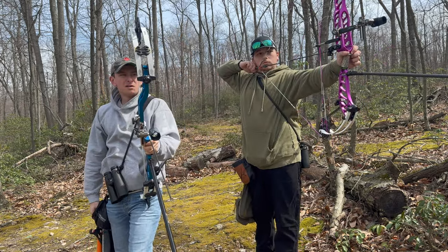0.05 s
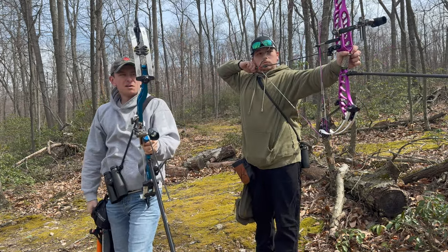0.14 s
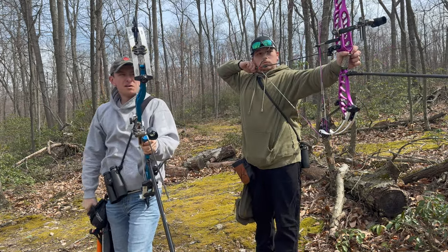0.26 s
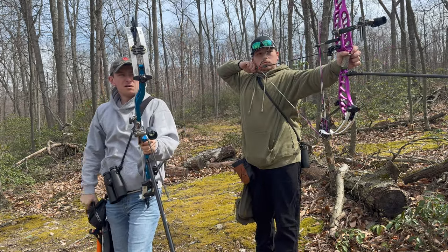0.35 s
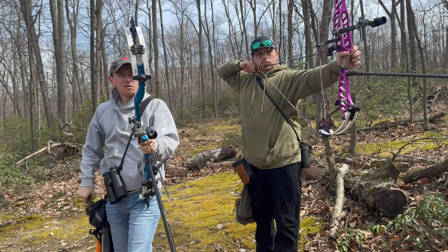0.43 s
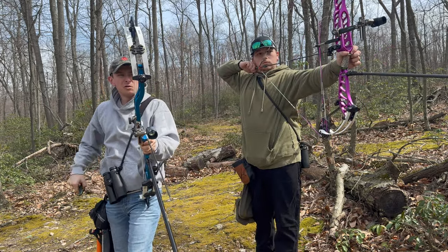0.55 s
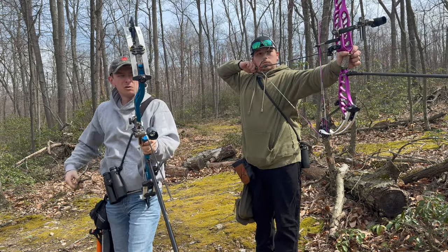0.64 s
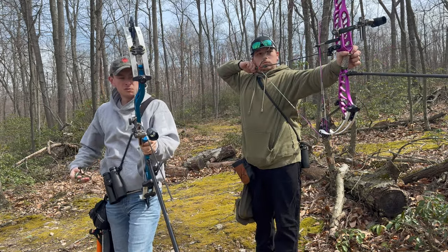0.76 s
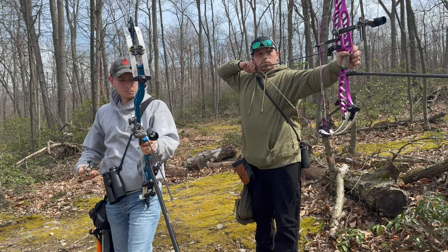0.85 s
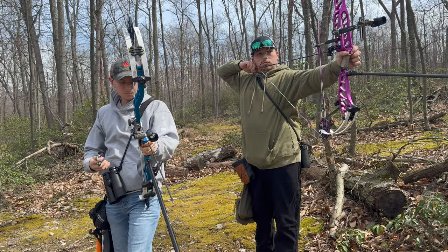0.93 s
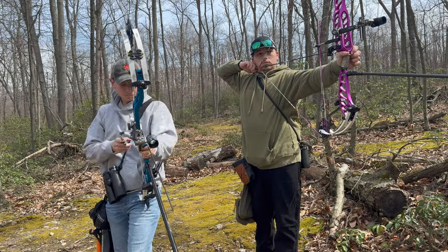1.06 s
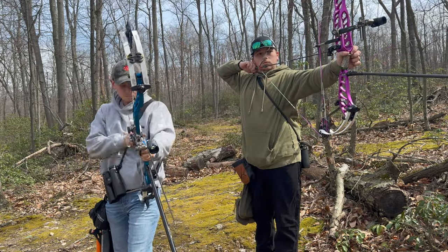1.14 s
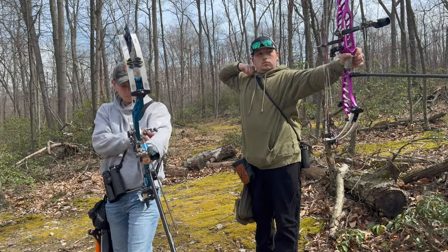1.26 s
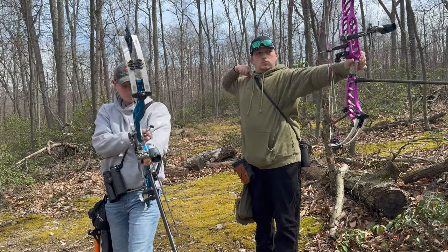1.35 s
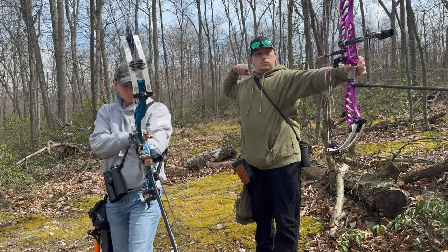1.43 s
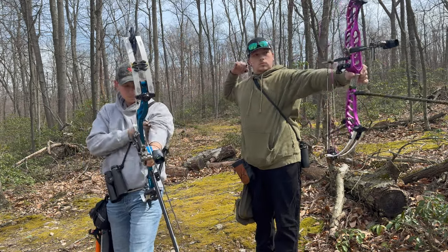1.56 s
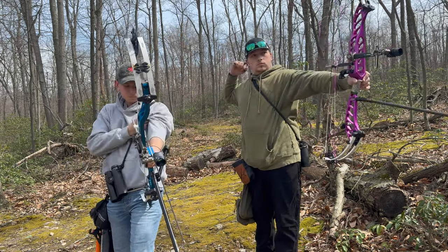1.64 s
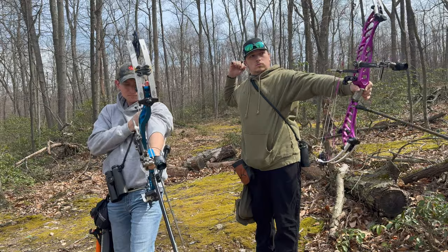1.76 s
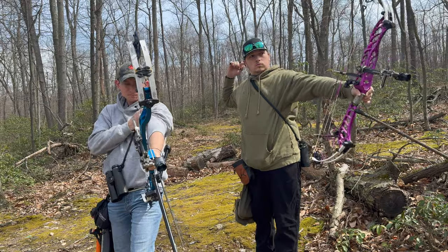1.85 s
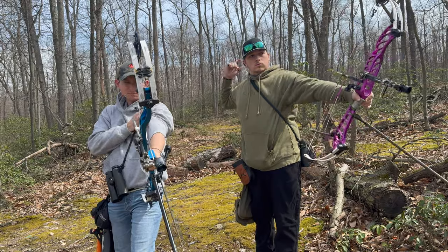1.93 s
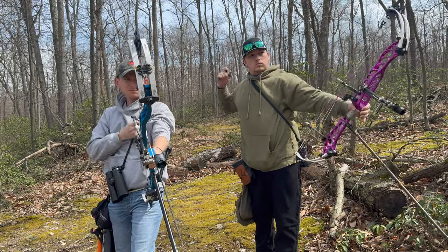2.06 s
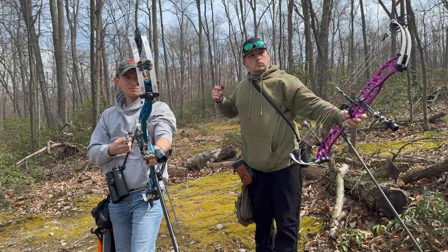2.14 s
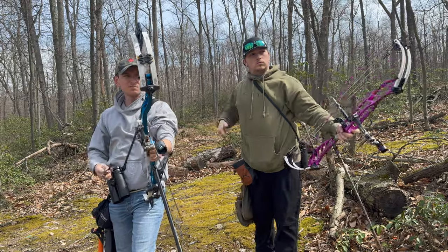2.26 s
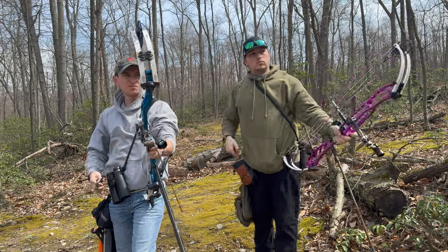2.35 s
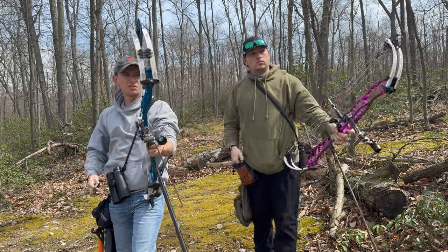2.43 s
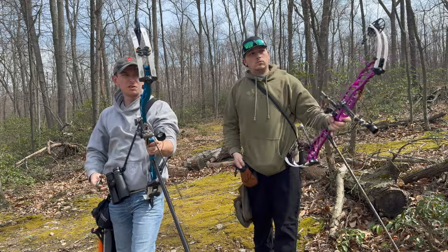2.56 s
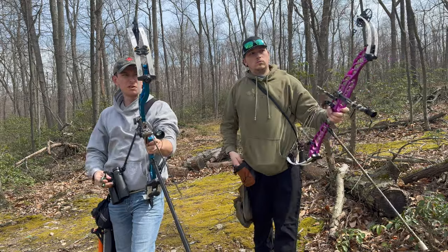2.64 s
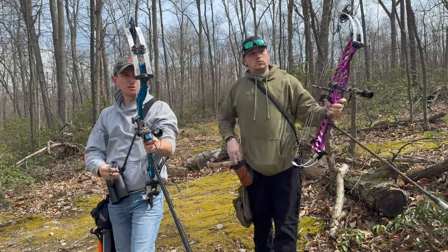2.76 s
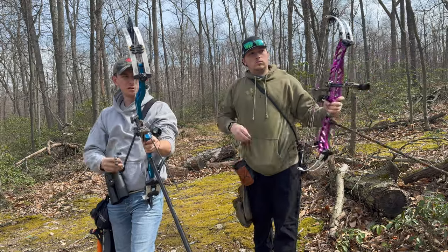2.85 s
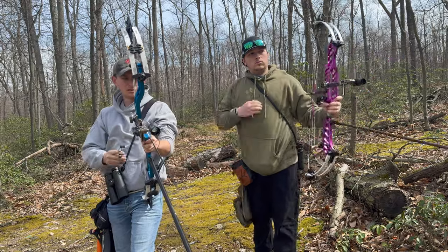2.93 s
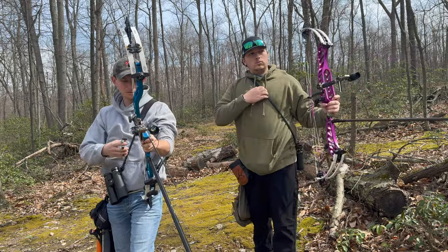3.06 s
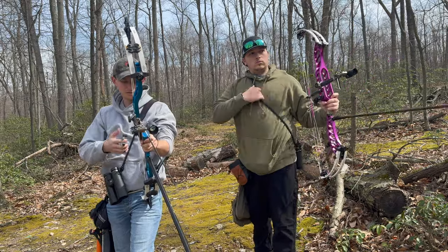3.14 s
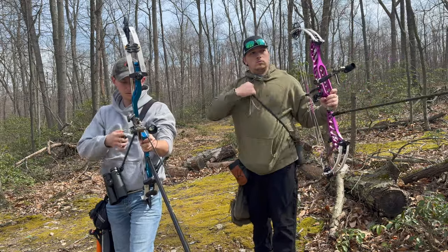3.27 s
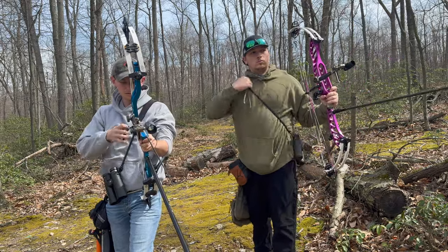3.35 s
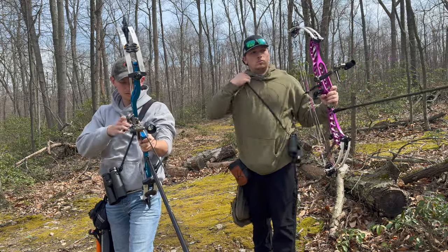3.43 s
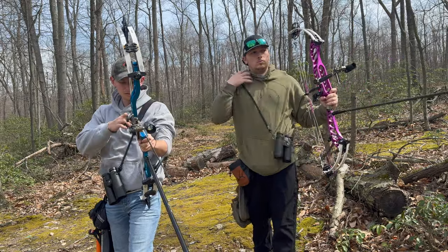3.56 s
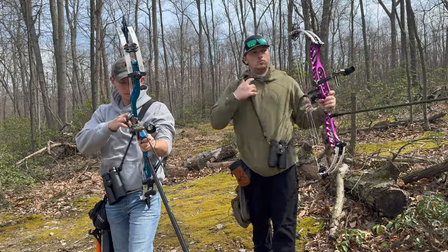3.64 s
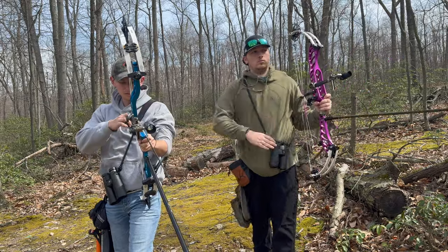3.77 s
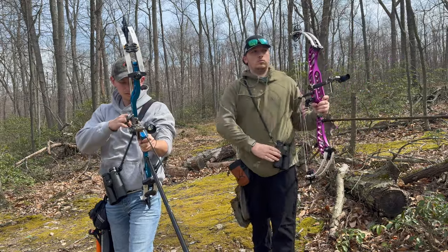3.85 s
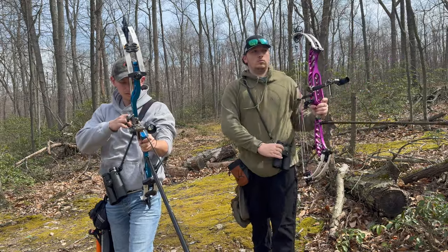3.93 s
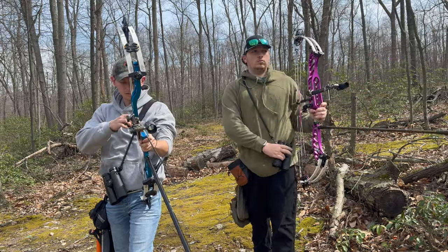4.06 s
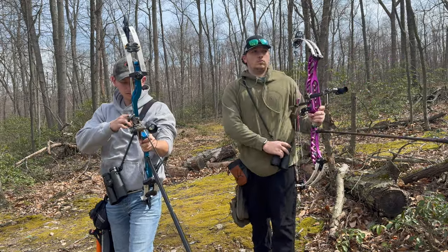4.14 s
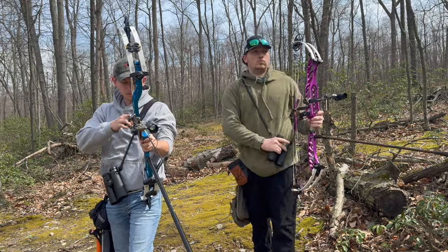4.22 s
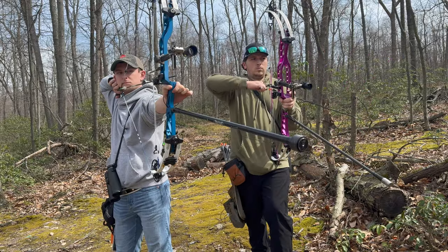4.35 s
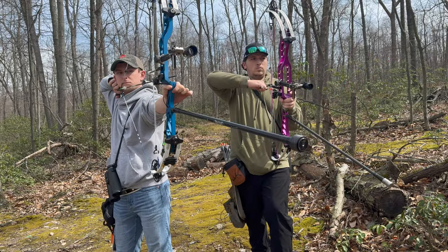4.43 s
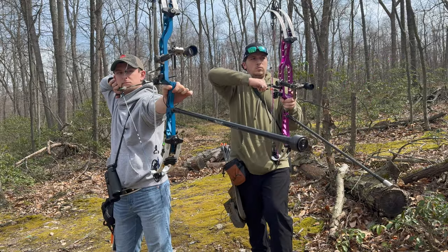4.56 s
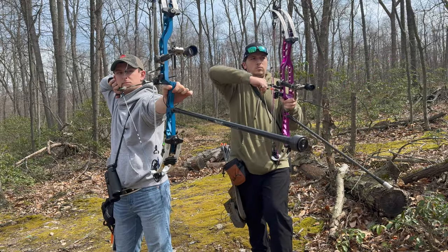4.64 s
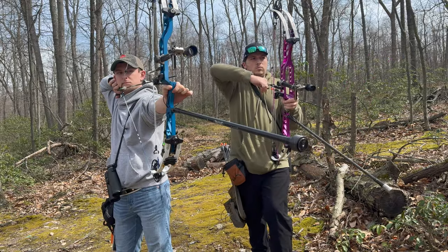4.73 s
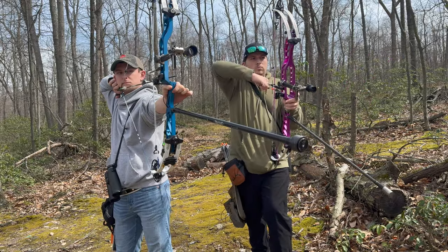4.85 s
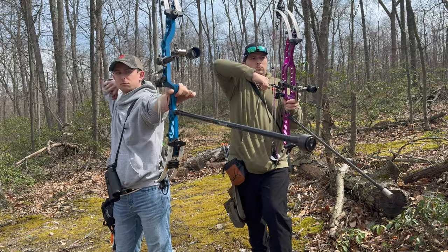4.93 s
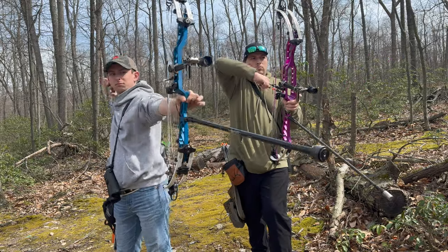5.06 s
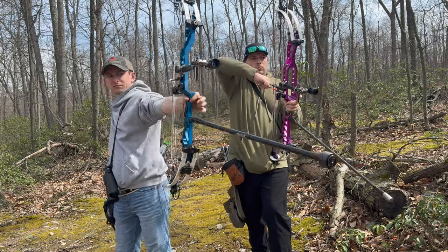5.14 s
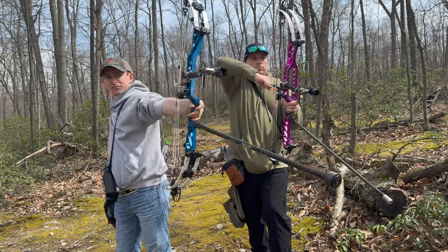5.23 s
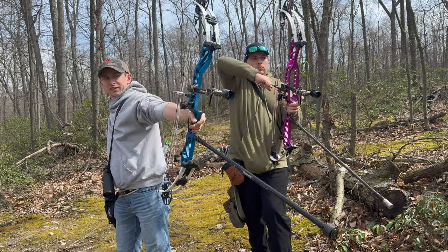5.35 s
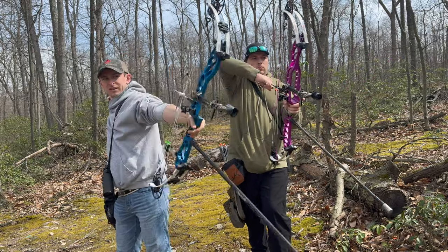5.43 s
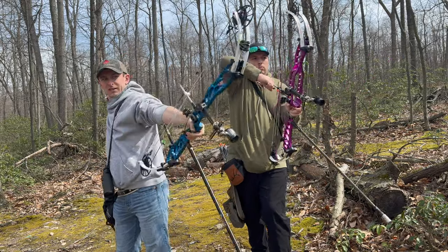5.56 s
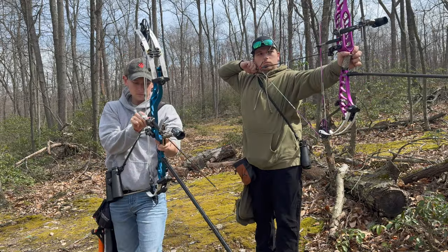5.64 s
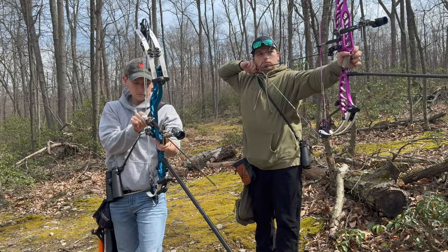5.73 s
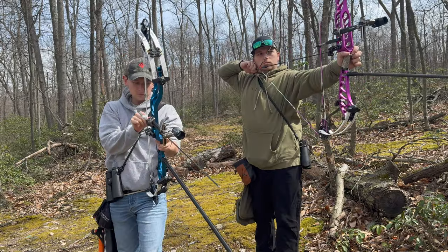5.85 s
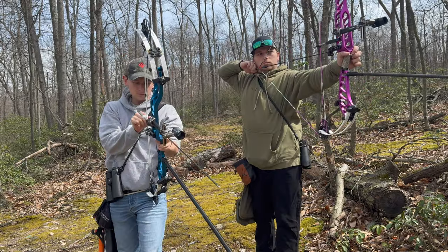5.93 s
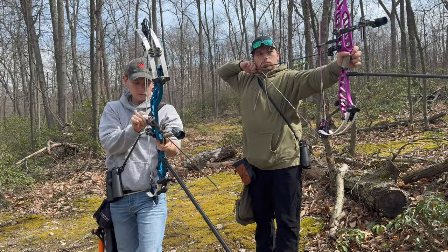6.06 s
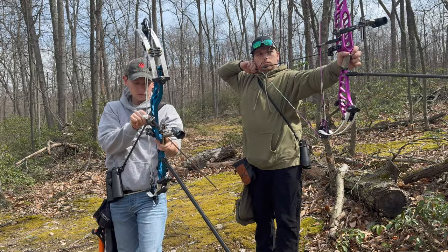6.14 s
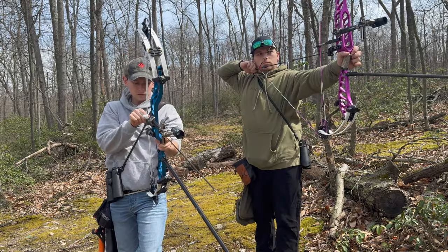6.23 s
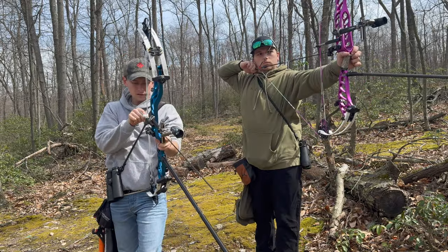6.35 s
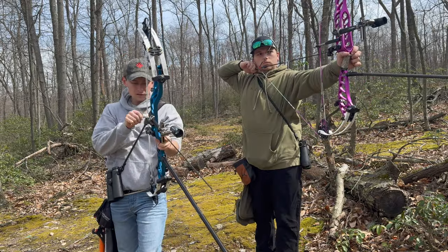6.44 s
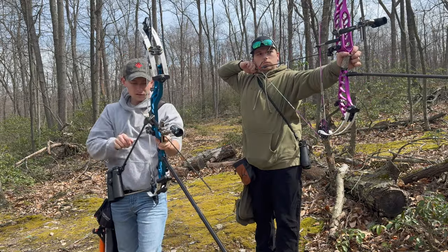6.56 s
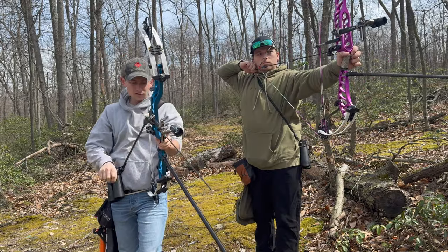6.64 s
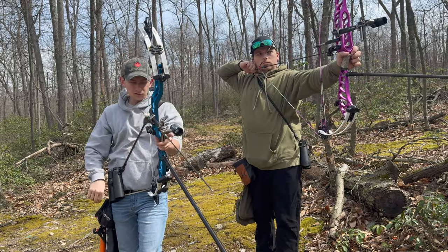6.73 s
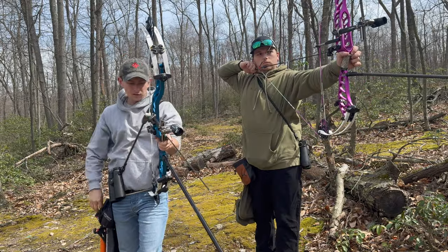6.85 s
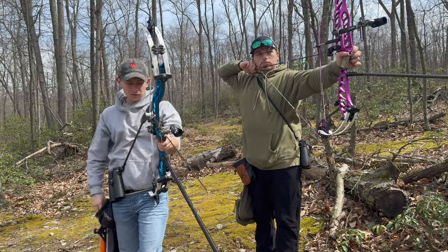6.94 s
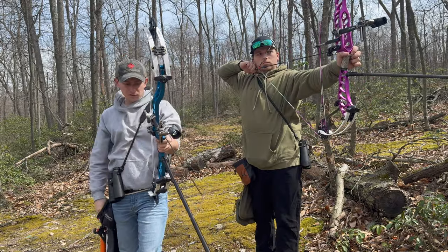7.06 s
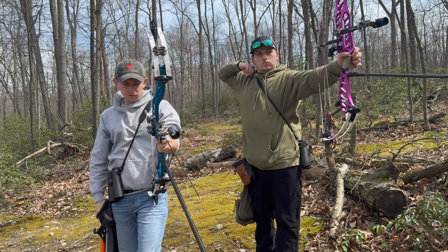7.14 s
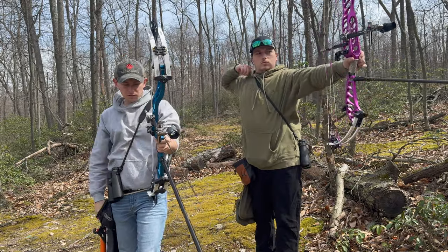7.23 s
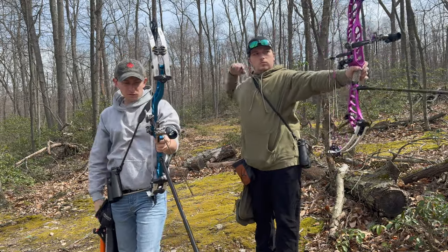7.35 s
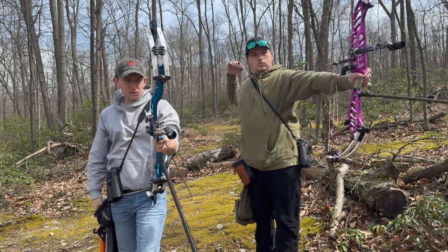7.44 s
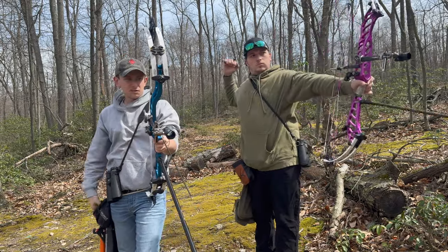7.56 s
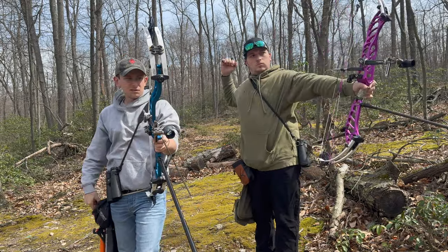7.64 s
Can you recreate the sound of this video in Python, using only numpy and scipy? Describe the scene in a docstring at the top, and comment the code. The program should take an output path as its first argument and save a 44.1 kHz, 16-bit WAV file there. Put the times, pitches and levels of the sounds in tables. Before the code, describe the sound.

Two archers shoot three arrows, heard in stereo from a few steps away. Each release is a brief hiss, a hard slam and a rattling, ringing buzz, then a smaller crack and thud from the distant target with a woody echo. Between shots come soft sleeve brushes, strap ticks and metallic clicks. Low outdoor rumble swells gently, and a very faint bird whistles near the end.

```python
"""Archers in a quiet wood

Two archers shoot three arrows from compound bows, a few steps from the listener. Noise makes each arrow's hiss,
damped modes and rattling noise the slam and ring of the bow, and ticking noise the buzz of its string. A quarter
second later a far target cracks, thuds and shudders, and decaying noise answers from the trees. Cloth and gear are
shaped noise, with a ringing clink; a far bird whistles late on, over a low, swelling rumble."""
import sys
import numpy as np
from scipy import signal
from scipy.fft import rfft, irfft, next_fast_len
from scipy.io import wavfile

SR = 44100
rng = np.random.default_rng(int(sys.argv[2]) if len(sys.argv) > 2 else 0)


def unload_wav(signal):
    """Save mono or channel-first audio to the path in sys.argv[1] as 16-bit WAV at rate SR, clipped to [-1, 1]."""
    wavfile.write(
        sys.argv[1],
        SR,
        np.round(np.clip(np.atleast_2d(signal).T, -1, 1) * 32767).astype(np.int16),
    )


N = 339129
T = np.arange(SR) / SR  # one second of time since a blow


def amp(db):
    """Decibels to gain."""
    return np.exp(np.asarray(db) * (np.log(10) / 20))


def unit(x):
    """Scales to rms 1."""
    return x / np.sqrt(np.mean(x ** 2) + 1e-20)


def read(points, hz):
    """Reads a table on a log-frequency axis."""
    f, value = np.transpose(points)
    return np.interp(np.log(hz + 1), np.log(f + 1), value)


def add(mix, s, sound):
    """Mixes a sound in at time s, cut off at the end of the mix."""
    part = mix[:, round(s * SR):][:, :sound.shape[1]]
    part += sound[:, :part.shape[1]]


def fall(t60):
    """Exponential decay by 60 dB in t60 seconds."""
    return np.exp(-np.minimum(np.log(1000) * T / max(t60, 1e-4), 40))


def hump(centre_hz, octaves):
    """The spectrum of one broad resonance, as a table of Hz and dB."""
    hz = np.geomspace(20, SR / 2, 80)
    distance = np.log2(hz / centre_hz) / octaves
    return np.c_[hz, -20 * np.log10(1 + distance ** 4)]


# How alike the two sides are. Each row: frequency in Hz, left-right coherence from 0 to 1.
COHERENCE = [(100, 0.96), (400, 0.69), (900, 0.68), (1600, 0.41), (3000, 0.13), (7000, .1), (14000, 0.027)]


def noise(spectrum, size=SR, diffuse=False):
    """Stereo noise of rms 1; unless diffuse, both sides are alike in the bass and drift apart above."""
    full = next_fast_len(size, real=True)
    hz = np.fft.rfftfreq(full, 1 / SR)
    left, other = rng.standard_normal((2, 2 * len(hz))).view(complex)
    same = 0 if diffuse else np.clip(read(COHERENCE, hz), -1, 1)
    right = same * left + np.sqrt(1 - same ** 2) * other
    coloured = np.array([left, right]) * amp(read(spectrum, hz))
    return unit(irfft(coloured, full)[:, :size])


def wander(size, rate_hz):
    """Random motion of rms 1, in straight glides between random points."""
    knots = rng.standard_normal(int(size / SR * rate_hz) + 2)
    return unit(np.interp(np.arange(size) / SR * rate_hz, np.arange(len(knots)), knots))


def ring(modes, build=0.0084, waver=0):
    """Damped modes, neighbours in opposite phase; long ones build up slowly, and a shaking body makes each waver."""
    out = np.zeros(SR)
    for k, (hz, db, t60) in enumerate(modes):
        drift = waver * wander(SR, rate_hz=28) * np.minimum(T / 0.055, 1)
        envelope = fall(t60) * (1 - np.exp(-T / (build * t60)))
        out += (-1) ** k * amp(db) * envelope * np.sin(2 * np.pi * hz * T + drift)
    return out


# Share of the left-right level difference that is heard. Each row: frequency in Hz, factor.
SHADOW = [(150, 0.26), (600, 1), (1400, 1.7), (3000, 0.4), (7000, 0), (13000, 0.084)]


def place(x, lag_ms, pan_db, turn=0):
    """Direction: the left port leads by a delay, a phase turn in radians and a level difference."""
    hz, side = np.fft.rfftfreq(SR, 1 / SR), np.array([[.5], [-.5]])
    angle = 2 * np.pi * hz * lag_ms / 1000 + turn
    ports = np.exp(1j * side * angle) * amp(side * pan_db * read(SHADOW, hz))
    fade_out = np.minimum(1, 2 * (1 - T)) ** 2
    return irfft(rfft(x) * ports, SR) * fade_out


# How long the trees keep sounding. Each row: frequency in Hz, decay by 60 dB in seconds.
TREES_T60 = [(100, 0.8), (500, 1.0), (1500, 1.05), (3500, 0.69), (7000, 0.51), (14000, 0.46)]


def trees(spectrum, rise_s):
    """Echoes from many trunks: a lumpy tail whose treble dies first."""
    hz, t, z = signal.stft(noise(spectrum, diffuse=True), SR, nperseg=256)
    decay = amp(-60 * t / read(TREES_T60, hz)[:, None])
    tail = signal.istft(z * decay, SR, nperseg=256)[1][:, :SR]
    return tail * (1 - np.exp(-T / rise_s)) * amp(1.5 * wander(SR, rate_hz=120))


# Wind and far traffic. Each row: frequency in Hz, relative level in dB per Hz.
AIR = [(12, -55.5), (25, -29.5), (42, -7), (60, 1.5), (100, -5.5), (150, -9.5), (230, -13), (400, -18.5),
       (580, -19.5), (760, -24.5), (1200, -33.5), (2200, -42), (3300, -50), (13000, -58)]
BREEZE_S, BREEZE_RISE_S, BREEZE_DB = 4.16, .4, 3.5  # a breeze comes up and lifts the rumble


def air():
    """The hush of the open wood, over a rumble that gently swells."""
    hush = amp(-56.5) * noise(AIR, N) * amp([[-.8], [.8]])
    rumble = signal.sosfiltfilt(signal.butter(2, 170, fs=SR, output="sos"), hush)
    breeze = np.clip((np.arange(N) / SR - BREEZE_S) / BREEZE_RISE_S, 0, 1)
    swell_db = BREEZE_DB * breeze + 1.8 * wander(N, rate_hz=7.8)
    return hush + rumble * (amp(swell_db) - 1)  # only the rumble swells


CLICK_DIRECT = .8  # share of a click's power that comes straight to both ports


def click(db, centre_hz, octaves, t60):
    """Two hard parts touch and chatter briefly: noise round one resonance, dying fast."""
    size = SR // 5
    chatter = (fall(t60) + amp(-20) * fall(0.13))[:size] * amp(2 * wander(size, rate_hz=720))
    colour, direct = hump(centre_hz, octaves), np.clip(CLICK_DIRECT, 0, 1)
    straight = np.sqrt(direct) * noise(colour, size)[0]
    spread = np.sqrt(1 - direct) * noise(colour, size)
    return amp(db) * chatter * (straight + spread)


# Nocks, release hooks and straps being handled.
# Each row: start in seconds, level in dB, centre in Hz, width in octaves, t60 in seconds.
CLICKS = [(.399, -61, 1390, 0.78, 0.069), (0.5032, -59, 2400, 1.5, .035), (2.2573, -47.5, 1070, .6, .033),
          (2.8091, -45, 11400, .5, .023), (2.814, -37.5, 6500, 2.14, .022),
          (3.3575, -50, 1360, 0.64, 0.027), (3.5797, -48.5, 697, 0.74, 0.083),
          (3.5838, -40, 3500, 1.9, 0.048), (3.606, -52, 6500, 2.6, 0.1), (4.0676, -41.5, 8500, 0.55, 0.026),
          (4.2438, -59, 5500, 1.7, .09), (5.378, -61, 4000, 1.5, .047), (5.8805, -46, 3200, 2.4, 0.046)]
# Faint ticks while the archers reload: span (from s, to s) and rate, then their typical sound.
FIDGET_SPAN, FIDGETS_PER_S = (1.8, 4.3), 3
FIDGET_DB, FIDGET_HZ, FIDGET_OCTAVES, FIDGET_T60 = -69, 2600, 1.3, .04
NOCKING_S = 5.8807  # an arrow snaps onto the string and its shaft clinks
# Modes of the clinking shaft. Each row: frequency in Hz, level in dB, t60 in seconds.
CLINK = [(660, -54.5, 0.14), (950, -57, .14), (1504, -54.5, .09), (1770, -58.5, 0.11), (2930, -50, 0.094),
         (7860, -51, 0.067)]


def gear():
    """Small hard parts knock together: a few clear clicks, faint ticks at random, and the clink of a nocked arrow."""
    out = np.zeros((2, N))
    for s, *blow in CLICKS:
        add(out, s, click(*blow))
    for s in np.arange(*FIDGET_SPAN, 1 / FIDGETS_PER_S):
        late, force, pitch = rng.uniform(-1.1, 1, 3)
        tick_hz = FIDGET_HZ * 2 ** (.6 * pitch)
        add(out, s + .12 * late, click(FIDGET_DB + 3 * force, tick_hz, FIDGET_OCTAVES, FIDGET_T60))
    add(out, NOCKING_S, place(ring(CLINK), 0, pan_db=3))
    return out


def string_slaps(string_hz, slap_hz, slap_t60):
    """The swinging string ticks against its stop once a cycle, unevenly."""
    jitter, force = rng.standard_normal((2, 40))
    times = (np.arange(1, len(jitter) + 1) + .09 * jitter) / string_hz
    train = np.zeros(SR)
    train[(times * SR).astype(int)] = amp(4.8 * np.clip(force, -2, 1.5))
    strokes = signal.fftconvolve(train, fall(0.0091))[:SR] * fall(slap_t60)
    return strokes * (noise(hump(slap_hz, 0.11)) + amp(-3.0) * noise(hump(6000, 1.5)))


# Limbs, riser and string of each bow; damped modes make the thump, long ones the twang.
# Each row: frequency in Hz, relative level in dB, t60 in seconds.
BOW_MODES = { "right": [(90, -21.5, 0.053), (120, -32.5, 0.46), (153, -37, 0.55), (195, -20, 0.052),
             (226.7, -27, .52), (241.3, -33, .35), (257.5, -27, 0.43), (312, -19.5, 0.056),
             (344, -34.5, .6), (400, -23, .06), (481, -38.5, .5), (565, -27.5, 0.51), (612, -17.5, 0.084),
             (705, -39.5, 0.37), (788, -29, 0.092), (843, -33.5, 0.12), (875, -38.5, 0.69),
             (970, -29.5, .1), (1014, -29, 0.26), (1175, -40.5, 0.3), (1744, -37.5, .12),
             (2043, -32, 0.15)], "left": [(79.76, -20, .08), (121, -17, .12), (134.5, -28, 0.29),
             (162, -17, 0.1), (205, -31, .65), (239, -16, 0.12), (263.8, -24.5, .17), (300, -26, .12),
             (355, -21, .1), (422, -22, .08), (528, -26.5, 0.24), (585, -17, .14), (630, -30, .45),
             (703, -25, .14), (840, -31.5, 0.3), (980, -35.5, 0.22), (1120, -33.5, .15), (1214, -27.5, 0.3),
             (1670, -31.5, .12), (2068, -34, .15), (2393, -35.5, .23), (3090, -35.5, .16)]}
# Rattle of cables and fittings, by bow. Each row: frequency in Hz, relative level in dB per Hz.
RATTLE = {"right": [(150, -24.5), (400, -3), (800, -1), (1400, -4), (2200, -4.5), (3300, -9.5), (5000, -9),
          (7500, -7.5), (12500, -11.5), (16000, -13.5)], "left": [(150, -18.5), (400, -1.5), (800, -2),
          (1400, -5.5), (2200, -5), (3300, -7), (5000, -11), (7500, -11), (12500, -12), (16000, -20)]}
# Each bow: levels in dB of slam, rattle, slaps and slide, t60 in seconds of rattle and slaps, string and slap
# pitch in Hz, length of the full buzz in seconds, lead of the left port in ms, left-over-right level in dB.
BOWS = {"right": dict(slam_db=-21.5, rattle_db=-23, rattle_t60=0.41, string_hz=112.8, slap_hz=7500, slap_db=-23, slap_t60=0.69, buzz_s=.17, slide_db=-38, lag_ms=-.09, pan_db=-3),
        "left": dict(slam_db=-21, rattle_db=-17, rattle_t60=0.31, string_hz=135.1, slap_hz=12500, slap_db=-16, slap_t60=.25, buzz_s=.135, slide_db=-33, lag_ms=.08, pan_db=1)}
# The shaft sliding on its rest. Each row: frequency in Hz, relative level in dB per Hz.
SLIDE = [(200, -15), (800, -0.5), (2500, -0.5), (4000, -3), (7000, -1.5), (12500, -0.5), (16000, -7.5)]
STROKE_LEAD = .019  # s from release to slam


def shot(level_db, crack_db, name):
    """The arrow's hiss surges as it slides off; the string slams home with a crack, a thump and a dying buzz."""
    bow, out = BOWS[name], np.zeros((2, SR))
    slide_times = [0, .002, STROKE_LEAD - .005, STROKE_LEAD, STROKE_LEAD + 0.0017]
    hiss = np.interp(T, slide_times, [0.5, 1.13, 0.74, 3.5, 0])
    slide = amp(bow["slide_db"]) * noise(SLIDE) * hiss
    crack_noise = noise(hump(bow["slap_hz"] * .97, .5))[0]
    crack = amp(crack_db) * crack_noise * np.exp(-abs(T - STROKE_LEAD) / 0.00081)
    rebound = amp(-2) * np.exp(-abs(T - .0072) / .0009)  # the cams bounce once on their stops
    slam = amp(bow["slam_db"]) * noise(RATTLE[name]) * (fall(.07) + rebound)
    shaking = fall(bow["rattle_t60"]) * amp(2.3 * wander(SR, rate_hz=350))
    rattle = amp(bow["rattle_db"]) * noise(RATTLE[name]) * shaking
    slaps = amp(bow["slap_db"]) * string_slaps(bow["string_hz"], bow["slap_hz"], bow["slap_t60"])
    # small swings no longer reach the stop
    touching = np.interp(T, [bow["buzz_s"], bow["buzz_s"] + .025], [1, .2])
    # the bow shakes in the hand
    twang = ring(BOW_MODES[name], build=0.013, waver=.45) * amp(1.3 * wander(SR, rate_hz=50))
    add(out, 0, slide)
    add(out, STROKE_LEAD, slam + (rattle + slaps) * touching + twang)
    body = place(out, bow["lag_ms"], bow["pan_db"])
    return amp(level_db) * (body + place(crack, 0, pan_db=-2, turn=0.76))


# Each row: second when the string slams home, level in dB, crack in dB relative to that level, which bow.
SHOTS = [(1.1699, 0.5, -15.5, "right"), (4.8397, 0, -25.5, "left"), (7.0760, .5, -10, "right")]


def shots():
    """Each bow stroke begins at the release, so that its slam lands on time."""
    out = np.zeros((2, N))
    for slam_s, *stroke in SHOTS:
        add(out, slam_s - STROKE_LEAD, shot(*stroke))
    return out


# Modes of the struck arrow. Each row: frequency in Hz, relative level in dB, t60 in seconds.
SHAFT = [(3300, -0.5, 0.0073), (4800, -7, 0.0067), (6960, -3.5, 0.0047)]
# The shuddering target. Each row: frequency in Hz, relative level in dB per Hz.
TARGET = [(120, -22.5), (380, 0.5), (700, -5.5), (1200, 1.5), (2200, -9), (3500, -5.5), (6000, -10),
          (9000, -17), (15000, -28.5)]
# Colour of the wood's answer. Each row: frequency in Hz, relative level in dB per Hz.
TREES = [(120, -14), (400, 0), (1300, -1.5), (3000, -6), (5000, -9), (8000, -15.5), (14000, -27)]


def target_hit(crack_db, thud_db, thud_hz, shudder_db, boom_db, echo_db):
    """The shaft cracks, the target thuds, shudders and booms, and the wood answers."""
    crack = amp(crack_db) * ring(SHAFT, build=.04) * 2
    thud = amp(thud_db) * ring([(thud_hz, 3, .016), (thud_hz * .55, -3, .012)], build=0.027)
    shudder = amp(shudder_db) * noise(TARGET) * fall(0.13) * amp(3.3 * wander(SR, rate_hz=400))
    boom_envelope = (fall(0.14) + amp(-14.5) * fall(0.83)) * (1 - np.exp(-T / 0.0077))
    boom = amp(boom_db) * noise(hump(350, .4)) * boom_envelope
    echo = amp(echo_db - 41.5) * trees(TREES, rise_s=.008)
    return place(crack + thud + shudder + boom, 0, pan_db=-4.0, turn=-1.78) + echo


# Arrows striking the target. Each row: start in seconds, relative levels of crack and thud in dB,
# thud in Hz, relative levels of shudder, hollow boom and echo in dB.
HITS = [(1.411, -17, -23, 1050, -28, -33.5, -2.5), (5.0913, -25.5, -19.5, 1355, -36.5, -54, -5),
        (7.3175, -14, -24, 1260, -31, -49, -4)]


def target_hits():
    """Every arrow that strikes the far target."""
    out = np.zeros((2, N))
    for s, *blow in HITS:
        add(out, s, target_hit(*blow))
    return out


# Strokes of sleeves and straps. Each row: start in seconds, length in seconds, swish in dB, brush in dB,
# growth of the swish from start to end in dB.
STROKES = [(1.48, .32, -75, -64, -8), (2.355, .335, -69.5, -57, 5), (2.63, 0.13, -59.5, -62.5, 5),
           (3.021, .52, -74.5, -75, -2), (3.62, .64, -78, -69.5, 6), (4.22, .15, -71, -70.5, -16),
           (5.56, 0.15, -79.5, -75, 1.5)]
# Grainy fibres. Each row: frequency in Hz, relative level in dB per Hz.
SWISH = [(1500, -12), (3000, 0.5), (5200, -7.5), (8200, 3), (12500, -4.5), (16000, -15)]
# Cloth on cloth. Each row: frequency in Hz, relative level in dB per Hz.
BRUSH = [(150, -1.5), (280, 3.5), (430, 11), (650, 0), (1000, -5.5), (1800, -5.5), (3000, -10),
         (6000, -25.5)]
CLOTH_ATTACK_S, CLOTH_RELEASE_S = .012, .05  # every swish starts and stops alike
BRUSH_ARCH = .5  # the cloth presses hardest in mid-stroke (power of a half sine)


def clothes():
    """Cloth brushes on cloth; fibres catch and let go in a grainy swish."""
    out = np.zeros((2, N))
    for s, length, swish_db, brush_db, growth_db in STROKES:
        t = np.arange(0, length, 1 / SR)
        motion = np.clip(np.minimum(t / CLOTH_ATTACK_S, (length - t) / CLOTH_RELEASE_S), 0, 1)
        pressure = abs(np.sin(np.pi * t / length)) ** BRUSH_ARCH
        grain_db = growth_db * (t / length - .5) + 2.4 * wander(len(t), rate_hz=500)
        swish = noise(SWISH, len(t)) * amp(swish_db + grain_db)
        brush = noise(BRUSH, len(t)) * amp(brush_db + 3 * wander(len(t), rate_hz=60))
        add(out, s, (swish * motion + brush * pressure) * amp([[-.4], [.4]]))
    return out


# The left bow's arrow on its rest. Each row: seconds before the slam, level in dB, centre in Hz,
# width in octaves, t60 in seconds.
SQUEAKS = [(.0157, -27.5, 12000, .29, .025), (.0104, -10, 12800, .35, .0074), (.0029, -22.5, 3900, .3, .02)]


def squeaks():
    """The left bow's arrow squeaks along its rest in narrow bursts just before the slam."""
    out = np.zeros((2, N))
    for slam_s, _, _, name in SHOTS:
        if name == "left":
            for early_s, *squeak in SQUEAKS:
                add(out, slam_s - early_s, click(*squeak))
    return out


BIRD_START_S, BIRD_STEP_S = 6.9, .125  # a far bird repeats a falling note


def bird(level_db=-91, top_hz=2350, bottom_hz=1700, note_s=.09, count=9):
    """Short falling whistles, each a little different, heard only through the echo of the wood."""
    song = np.zeros((1, N))
    pitch = np.interp(T, [0, note_s], [top_hz, bottom_hz])
    swell = np.sin(np.pi * np.minimum(T / note_s, 1)) ** 2
    for k, (detune, effort) in enumerate(rng.standard_normal((count, 2))):
        note = np.sin(2 * np.pi * np.cumsum(pitch * (1 + .06 * detune)) / SR)
        add(song, BIRD_START_S + k * BIRD_STEP_S, (amp(2.9 * effort) * swell * note)[None])
    echo = trees(hump(2005, 1), rise_s=0.0023) * fall(0.37)
    return amp(level_db) * signal.fftconvolve(song, echo / np.linalg.norm(echo[0]), axes=1)[:, :N]


def scene():
    """Near bows, gear and clothes with a faint echo, the far target, the air and a bird."""
    near = gear() + shots() + clothes() + squeaks()
    tail = trees([(100, -2), (1500, -0.5), (6000, -2), (14000, -6.5)], rise_s=0.013)
    echo = signal.fftconvolve(near, tail / np.linalg.norm(tail[0]), axes=1)[:, :N]
    return near + amp(-23.5) * echo + target_hits() + air() + bird()


# Two fixed dips in the treble, near 9.8 and 14.6 kHz. Each row: frequency in Hz, gain in dB.
TREBLE_DIPS = [(8800, 0), (9500, -26), (10100, -26.5), (10800, -1), (13300, 0.5), (14300, -19),
               (15000, -18), (15700, -3)]
EDGE_HZ = 16300  # upper band limit


def record(dry):
    """Applies the two treble dips, then the upper band limit."""
    dipped = irfft(rfft(dry) * amp(read(TREBLE_DIPS, np.fft.rfftfreq(N, 1 / SR))), N)
    low_pass = signal.firwin(255, EDGE_HZ, window=("kaiser", 9), fs=SR)
    return signal.oaconvolve(dipped, low_pass[None], "same")


dry = scene()
out = record(dry)
unload_wav(out)
```